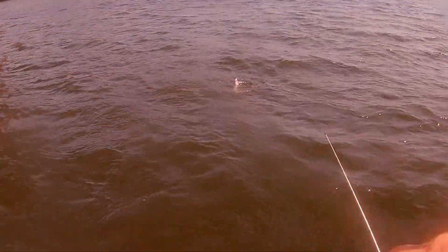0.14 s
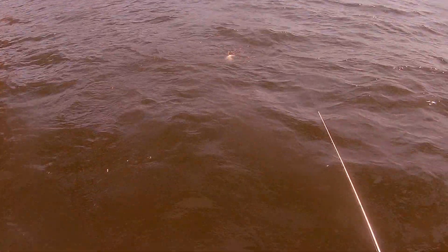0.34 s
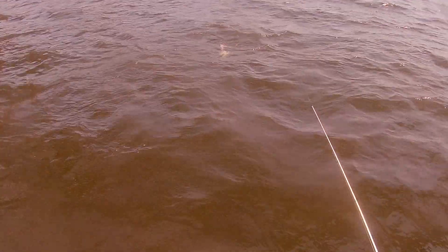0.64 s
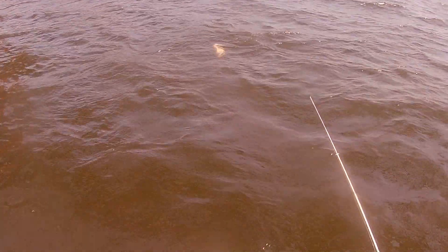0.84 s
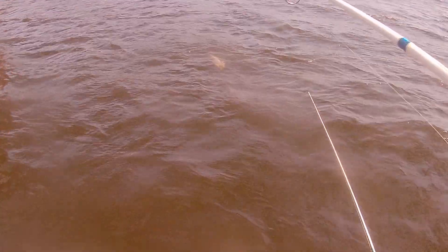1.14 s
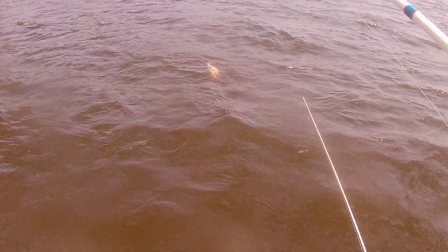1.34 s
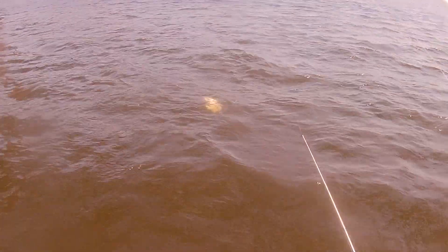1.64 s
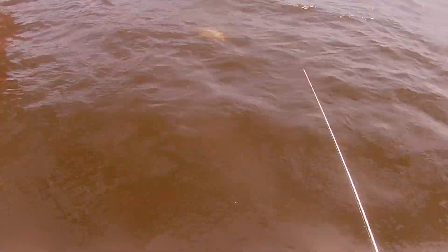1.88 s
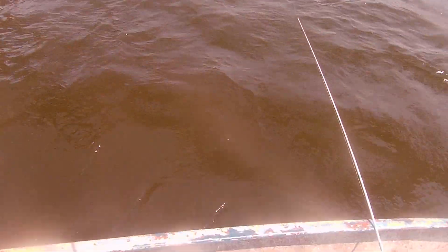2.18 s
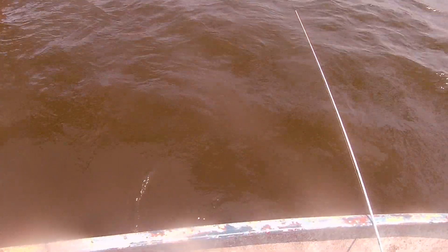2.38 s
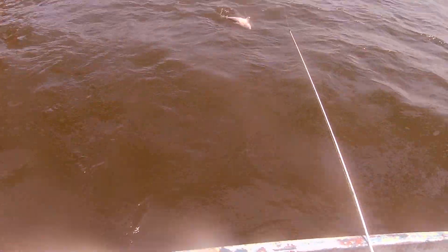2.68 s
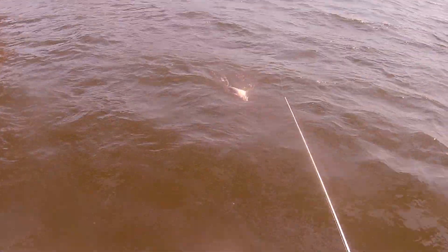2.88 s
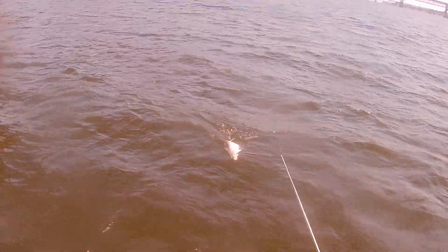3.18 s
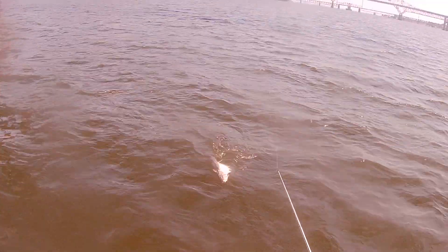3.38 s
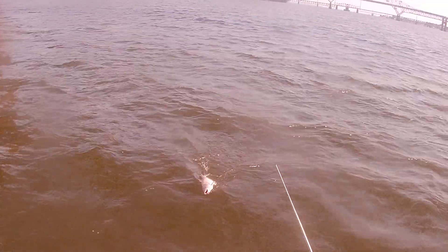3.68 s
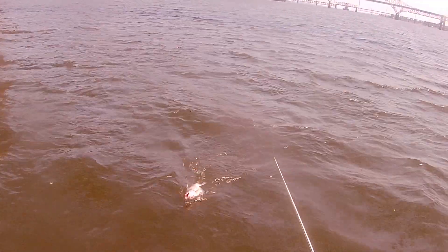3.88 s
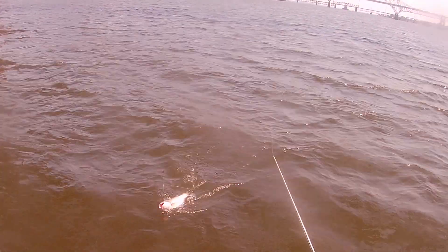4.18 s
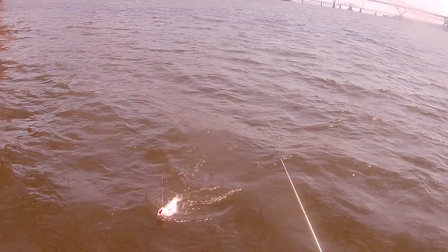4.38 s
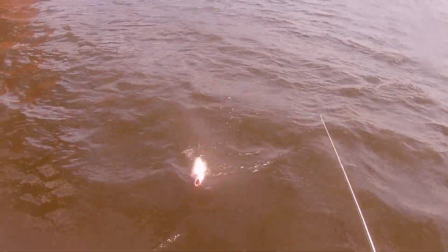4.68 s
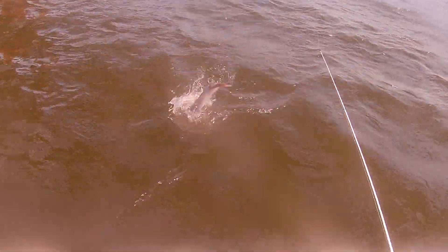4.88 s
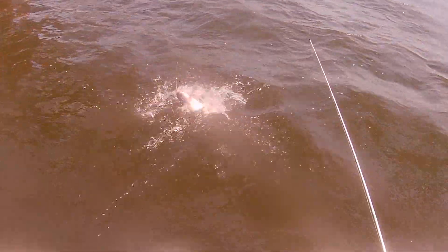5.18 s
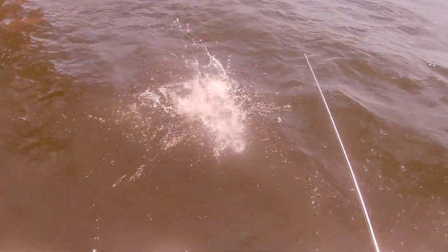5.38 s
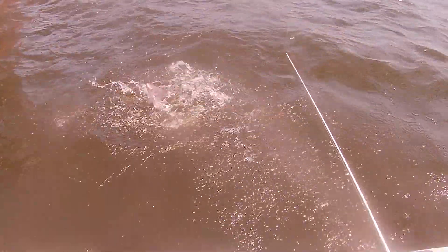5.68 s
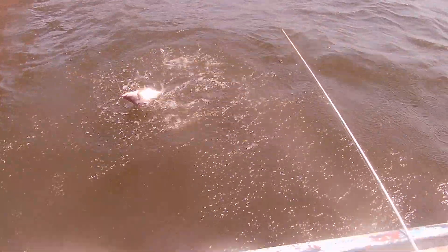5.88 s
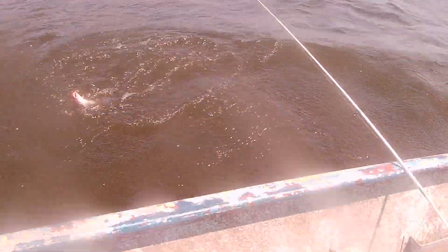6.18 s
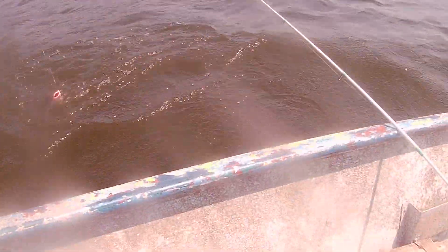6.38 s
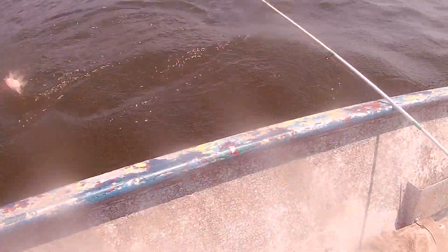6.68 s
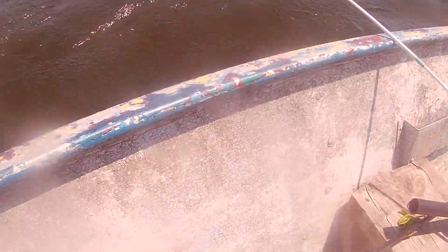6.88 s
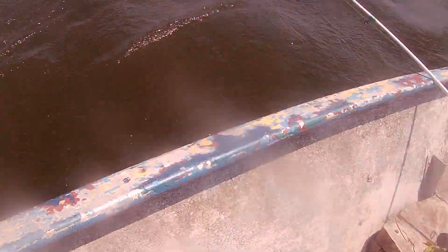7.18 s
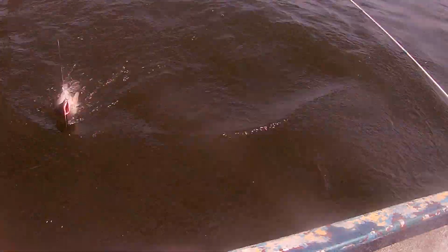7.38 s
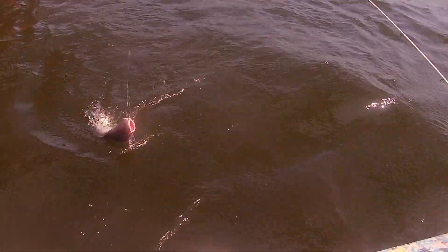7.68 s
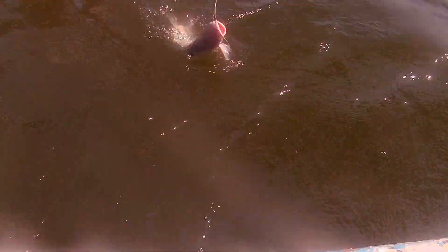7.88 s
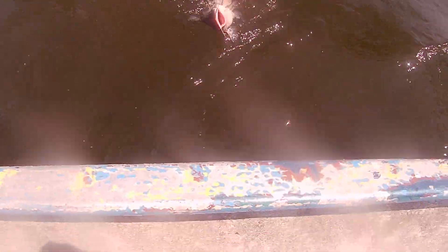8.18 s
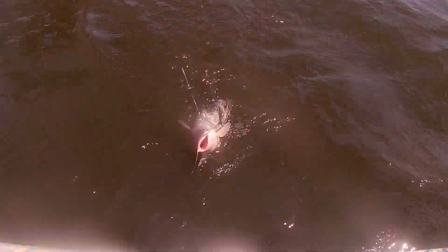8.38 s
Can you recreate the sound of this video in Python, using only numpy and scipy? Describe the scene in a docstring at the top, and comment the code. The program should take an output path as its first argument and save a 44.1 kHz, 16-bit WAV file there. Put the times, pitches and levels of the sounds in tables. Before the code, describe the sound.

Close, boxy bumps and scrapes on a camera housing drown out a hooked fish's dull splashing beside a boat, then hard clipped blows return.

```python
"""A sealed camera case worn on a strap is knocked, squeezed and rubbed, far louder than the water outside.
Blows ring the plastic and its mount, squeezes swing the air inside, and rubbing is dense noisy grains.
Faint behind the walls, a hooked fish splashes beside a boat on a wide river: slaps, bubbles and spray.
Tackle clicks, faint thin tones, lapping water, low rumble and microphone hiss lie around it.
The hardest blows overload the recorder, which clips them and cuts the extreme treble."""
import sys
import numpy as np
from scipy import signal
from scipy.fft import rfft, irfft, next_fast_len
from scipy.io import wavfile
from scipy.ndimage import uniform_filter1d

SR = 44100
rng = np.random.default_rng(int(sys.argv[2]) if len(sys.argv) > 2 else 0)


def dump(signal):
    """Clip the signal to [-1, 1] and save it as 16-bit WAV at the path in sys.argv[1]."""
    limited = np.clip(np.atleast_2d(signal).T, -1, 1)
    pcm = np.round(limited * 32767).astype(np.int16)
    wavfile.write(sys.argv[1], SR, pcm)


N = 376613  # length in samples

# Resonances of the plastic case when touched, before grip and blow alter them.
# Each row: frequency in Hz, width in Hz, relative level in dB.
CASE_MODES = [(265, 103, -1.5), (932, 204, -0.5), (1332, 197, 1.5), (1807, 355, -2.5), (2157, 113, -4.5),
              (2640, 120, -15.5), (3390, 110, -9.5), (3750, 190, -16.5), (4044, 324, -12), (5140, 230, -19),
              (6150, 72, -16.5), (7250, 100, -41.5), (8300, 270, -62), (9670, 260, -32)]
# Modes of the mount under the case, ringing freely.
# Each row: frequency in Hz, relative level in dB, time to fall 60 dB in seconds.
MOUNT_MODES = [(250, -8, 0.09), (1550, -6, 0.022), (915, -1.5, 0.07), (500, 1.5, 0.04), (635, 0, 0.155),
               (649, -11, 0.42)]
# Blows on the case, and a thump that may come from the hull.
# Each row: start in seconds, peak of the case sound in dB, brightness in dB per octave,
# gain of the two lowest case resonances in dB, gain of the main resonance in dB, contact in ms,
# rattle in dB against the blow, ring of the mount in dB, gain of its high mode in dB,
# gain of its low mode in dB, factor on the mount's ring time.
KNOCKS = [(1.408, -7, -1.5, 9, 7, 0.18, -32, -18, -18, -4, 0.63),
          (1.522, -13, 4.5, 4.5, -2, 0.25, -9.5, -32, 10, 6, 0.52),
          (1.568, -27, -10, 8, 0, 0.42, -14, -27, -20, 2, 0.67),
          (1.672, -5, -10, 7, 6, 0.1, -23, -21, 4.5, -2.5, 0.78),
          (1.752, -44, -5, 9, 0, 0.18, -17, -39, -12, -5, 1.1),
          (1.791, -31, 13, 7, -8, 0.19, -10, -28, -7, 4, 0.75),
          (1.942, -20, -1, 0, 1, 0.042, -15, -50, -6, 4, 0.98),
          (2.038, -26.5, -2, -7, -6, 0.33, -25, -47, 2, -2, 0.83),
          (2.054, -30, -6, -2, 0, 0.35, -18, -54, 3, 0, .9),
          (2.168, -50, -8, 0, 0, 0.77, -20, -39, -20, -12, 1.2),
          (2.216, -42, -12, 12, -4, .9, -14, -60, -10, 5, .6),
          (2.326, -30.5, -10, 0, -5, 0.47, -11, -33, -13, -4, 0.7),
          (2.39, -55, -8, -1, 0, 0.54, -20, -49, -20, -18, .9),
          (2.66, -62, -8, 0, 0, 0.54, -20, -56, -20, -15, 0.99),
          (2.7, -48, -10, 10, -4, 0.73, -10, -49, -5, 8, .7),
          (2.994, -47, -8, 14, 0, 0.73, -13, -45, -7, 11, 0.79),
          (3.098, -23, -13, 4, -3, 0.62, -16.5, -37, -7, 11.5, 0.3),
          (3.246, -17.5, -2.5, -7.5, -6, 0.31, -20, -38, -7, -11, 0.54),
          (3.26, -29, 5.5, 5, 10, 0.024, -28, -53, -7, 4, .9),
          (3.295, -56, -8, 8, 0, 0.65, -15, -50, -20, -15, 1.2),
          (3.361, -15, 2, -8, -5.5, 0.31, -25, -27, -0.5, -2, 0.88),
          (3.417, -21.5, 2, -5, -7, 0.45, -24, -26.5, 7.5, 3, 1.01),
          (3.552, -31, -14, 8, 0, 0.71, -13, -43, 4, 4, 1.2),
          (3.604, -16.5, 5, -8, -3, 0.22, -30, -41.5, 10, 0, 1.3),
          (3.62, -30, -23, -8, -4, 0.13, -19, -39.5, 6, 7, 1.1),
          (4.116, -26.5, -9, 9.5, 1, 0.26, -21, -42, -7, 9, 0.77),
          (4.278, -26, -8, 18, -2, .6, -14, -54.5, -9, -2, .9),
          (4.341, -30, -3.5, 6, -9, 0.25, -13.5, -51, 17.5, -5, 3.3),
          (4.407, -40, 0, 11, -2, 0.17, -14, -33.5, -21, -14, 0.85),
          (4.416, -44, 0, 6, -3, 0.18, -14, -27.5, -23, -18, 0.34),
          (4.43, -44, -3, 8, 0, .22, -14, -53.5, 24, -3, 1.5),
          (4.683, -64, -8, 0, 0, 0.38, -20, -52, -20, -17, .8),
          (4.745, -37, -3, 1, -3, 0.48, -9, -60, 1, 0, .4),
          (4.837, -37, -1, 1, -4, 0.66, -7, -62, 0, 4, .5),
          (6.05, -52, -8, 3, 0, 0.46, -14, -47.5, -13, -10, 0.72),
          (6.2, -50, -6, -0.5, -2.5, .4, -6, -66, -7, 2, .7),
          (6.803, -42, -10, 18, 0, 0.64, -10, -55, 0, 0, .8),
          (6.824, -47, -5, 18, 0, 0.62, -6, -62, 0, 0, .8),
          (7.592, -3.5, -23, 5.5, 4.5, 0.45, -22, -35, 13, -3, 1.8),
          (7.678, 2.5, -4, 4, -0.5, 0.16, -17, -15.5, 5, 3, 0.84),
          (7.745, -28, -9, 10, -2, 0.73, -26, -29, -2, 10, 0.62),
          (7.8954, 14, -12, -14, 0, .25, -30, -23, -9, 4, .5),
          (7.98, -22, -3, 1, 2, 0.43, -11, -32, -14, 6, 1), (8.15, -30, -15, 10, 0, 1, 0, -48, 3, 0, 0.75),
          (8.25, -33, -11, 16, -4, 0.87, -10, -43, -2, 15, 0.43),
          (8.295, -8.5, -1, 12, 5.5, 0.19, -21.5, -20, -13, 7.5, 0.85),
          (8.44, -28, -10.5, 17, -6, 0.3, -10, -50.5, 22, 0, 0.57)]
# The case is squeezed and the air inside swings.
# Each row: time of the dip in seconds, depth in dB, swing in Hz at the dip,
# share left half a cycle before (0-1), share left half a cycle after (0-1).
SQUEEZES = [(1.4094, -8, 418, 0.57, 0.15), (1.418, -0.5, 80, 0.4, 0.14), (1.528, -6.5, 87, 0, 0.86),
            (1.573, -22, 87, 0.9, 0.3), (1.68, -9.5, 108, 0, 0.2), (1.766, -9.5, 46.3, 0.76, 0.75),
            (1.797, -4, 66, 0, 0.6), (1.82, -16, 59, 0.8, 0.96), (1.963, -20.5, 48.6, 0, 0.95),
            (2.055, -15, 145, 0.02, 0.78), (2.196, -21.5, 39.4, 0.8, 0.88), (2.254, -29, 40, 1, 0.6),
            (2.328, -3, 116, 0, 0.02), (2.583, -31, 59, 0.8, 0.99), (2.62, -32, 48, 0, 0.3),
            (2.902, -30, 61, 0, 0.99), (2.995, -23.5, 123, 0.04, 0.93), (3.076, -23.5, 92.5, 0.2, 0.64),
            (3.248, -13.5, 228, 0, 0.94), (3.362, -11.5, 413, 0.02, 0.04), (3.419, -15, 408, 0, 0),
            (3.605, -19, 340, 0, 0.2), (3.62, -23.5, 157, 0, 0.5), (4.125, -25.5, 111, 0.1, 0.85),
            (6.663, -38, 117, 0.9, 0.1), (6.83, -34.5, 22, 0.7, 0.5), (7.603, 3.5, 78.5, 0.76, 0.27),
            (7.613, -9, 105, 0, 0), (7.65, -4, 59, 0.4, 0.1), (7.668, -2, 66.6, 0.35, 0.3),
            (7.7, -2.5, 68, 0, 0.87), (7.791, -11.5, 93, 0.1, 0.44), (7.809, -19, 70, 0.4, 1),
            (7.977, -12.5, 113, 0, 0.73), (8.153, -18, 121, 0, 0.63), (8.272, -31, 170, 0.56, .6),
            (8.335, -23, 150, 0.2, 0.2), (8.459, -16, 46.2, 1, 0.85)]
# Single scrapes of the case.
# Each row: start in seconds, end in seconds, rise in ms, force in dB, change in dB by the end,
# brightness in dB per octave, treble gain in dB, shake of the mount in dB against the force.
SCRAPES = [(1.381, 1.411, 9.4, -46, 5, -4, 0, -22), (1.408, 1.502, 1.5, -32, -4.5, -0.5, 1.5, -28),
           (1.554, 1.578, 10.7, -29, 0.5, -6, 0, -30), (1.581, 1.625, 4.2, -34, -1.5, -4, -3, -31),
           (1.626, 1.658, 5.3, -39.5, -1, -10, 0, -25), (1.654, 1.695, 8.1, -36.5, 7, -2.5, 0, -21),
           (1.672, 1.709, 4.3, -25.5, -2.5, -7, 9, -24), (1.745, 1.795, 4, -30, -7.5, 0, -2, -27),
           (1.79, 1.848, 2.4, -32.5, -3, -2.5, 5, 0), (2.001, 2.017, 4, -39.5, -5, -9, -3, -15),
           (2.053, 2.192, 61, -30.5, -7, -4.5, -2, -14), (2.329, 2.382, 1.8, -36.5, -29, -8, 0, -9),
           (2.912, 2.96, 6.3, -44, -10, -5, -2, -15), (3.041, 3.082, 6.3, -47.5, -6, -9, 0, -22),
           (3.558, 3.588, 6, -45, -9, -4, 0, 4), (3.806, 3.897, 13, -54, 4, -2.5, 0, 2.5),
           (3.946, 4.056, 28, -45.5, -1, -3.5, -2, -5), (4.205, 4.326, 52, -42.5, -2.5, -2.5, 10, -5.5),
           (4.332, 4.357, 5.7, -45, -8, -2, 0, 6), (4.382, 4.435, 3.8, -48.5, 8, -3, -3, -1),
           (6.022, 6.083, 8, -62, -10, -5, 0, 10), (6.163, 6.28, 12, -55.5, -1, -7, 5, -5),
           (6.775, 6.886, 27, -47, -5.5, -7.5, 0, -8), (7.59, 7.621, 1.1, -39, -8, 5.5, 5, -7),
           (7.607, 7.642, 4, -29.5, 4, -2.5, 11.5, 5.5), (7.646, 7.677, 6, -44, -4, 5, 1, -20),
           (7.689, 7.717, 3.6, -30, 6, -3, -4, -25), (7.89, 7.939, 6.3, -34.5, -15.5, 4, 1, -24),
           (8.263, 8.309, 23, -51, 15, -0.5, -2, -22), (8.305, 8.343, 1.4, -37, -14, -3.5, 1, -27),
           (8.434, 8.467, 5, -47, -1, -6.5, 3, -21)]
# The strap creeps over the case: one list of points for each stroke.
# Each row: time in seconds, force in dB, brightness in dB per octave.
CREEP = [
    [(1.41, -29.5, -3.5), (1.55, -43, -2), (1.65, -47, -4.5), (1.848, -42.5, -3.5), (1.996, -51.5, -2.5),
     (2.126, -49, -6.5), (2.2, -61, -9), (2.4, -86, -5)],
    [(2.62, -65, -4), (2.99, -51.5, -7), (3.4, -58.5, -2), (4.27, -52, -7.5), (4.62, -68, -8.5)],
    [(7.6, -40, -13.5), (7.644, -34.5, -6), (7.764, -42.5, -2.5), (7.802, -46, -11), (8.278, -65.5, -11.5),
     (8.394, -51, -8.5), (8.54, -63, -2)],
]
# Resonances of the walls and seal for sound arriving through the air.
# Each row: frequency in Hz, width in Hz, relative level in dB.
WALL_MODES = [(262, 150, -16.5), (1020, 470, -17), (1364, 168, 7.5), (1885, 216, 2), (2042, 245, -3.5),
              (3527, 103, -5), (3673, 98, -5.5), (4190, 130, -15.5), (4100, 92, -17.5), (5270, 230, -23),
              (5970, 140, -28.5), (6450, 170, -26.5), (6900, 160, -34), (9450, 490, -46.5)]
# Tail slaps and large drops.
# Each row: start in seconds, peak in dB, brightness in dB per octave, decay constant in ms.
SLAPS = [(0.515, -47.5, 9, 10), (0.774, -48, 0, 34), (0.89, -54, 0, 8), (1.095, -42.5, -4, 3.6),
         (1.127, -57, 13, 9.3), (4.741, -41, -0.5, 12), (4.75, -43, -6, 3.4), (4.778, -45, -1, 4),
         (4.837, -39.5, -7, 3.3), (4.881, -53, -9, 6), (4.897, -50, 1, 6), (4.936, -36.5, 12.5, 8.9),
         (4.983, -39, -3, 7.6), (5.033, -37, -6, 12), (5.047, -40.5, -1, 20), (5.072, -36.5, 7, 8.8),
         (5.105, -40, -5, 11), (5.223, -43, 11, 1.6), (5.239, -36.5, -10, 3.1), (5.249, -36.5, 3.5, 3.3),
         (5.318, -41.5, 9, 11), (5.341, -41.5, 9, 18), (5.421, -34, -4, 10), (5.501, -44, -2, 15),
         (5.584, -33, 8.5, 3.7), (5.629, -59, 2, 5), (5.656, -46, 5, 6.7), (5.706, -41, -0.5, 4.1),
         (5.748, -43.5, -4, 9.4), (5.787, -40, -17, 3.9), (5.916, -47, -6, 3.3), (6.113, -44, -9, 8.2)]
# The fish churns the surface in gushes.
# Each row: time of the peak in seconds, gain in dB before the walls, 60 dB fall in seconds.
GUSHES = [(4.745, -72, .8), (4.838, -53, 0.18), (4.91, -51, 2.9), (5.036, -48, 0.44), (5.24, -57, 0.49),
          (5.356, -49.5, 3), (5.588, -65, 0.12), (5.682, -59, 1.5), (5.92, -71, 0.042)]
# The fish is dragged along the surface: one list of points for each drag.
# Each row: time in seconds, level in dB before the walls.
WAKE = [
    [(2.72, -84), (2.82, -64.5), (3.08, -64), (3.3, -97)],
    [(7.7, -42), (7.75, -46), (7.83, -48.5), (7.88, -55), (7.96, -54.5), (8.12, -63.5), (8.25, -65.5),
     (8.36, -62), (8.42, -51)],
]
# Tackle clicks somewhere in the boat.
# Each row: start in seconds, peak in dB, brightness in dB per octave, decay constant in ms, top in Hz.
CLICKS = [(1.282, -32.5, 2, 6.9, 7040), (1.305, -43.5, 21, 3.8, 6900), (1.34, -41, 4.5, 13, 7000),
          (6.704, -17, 10, 8.4, 4400), (6.725, -34.5, -5, 22, 4400), (6.925, -47.5, 4, 30, 4500),
          (7.355, -38, 7, 8.2, 5000)]
# Faint thin tones, falling ones near 1.4 kHz and brief high ones, before their wavering.
# Each row: start in seconds, length in seconds, start pitch in Hz, end pitch in Hz, level in dB.
THIN_TONES = [(0.449, 0.084, 1473, 1400, -59), (0.468, .04, 7350, 7350, -68), (.54, .03, 7350, 7350, -66),
              (0.602, 0.1, 1405, 1290, -51), (0.943, .03, 7350, 7350, -61.5), (1.01, .04, 7350, 7350, -67),
              (1.066, 0.11, 7440, 7250, -62.5), (1.164, 0.064, 7350, 7350, -63)]
# The wearer shifts and the case rumbles on.
# Each row: time of the peak in seconds, gain in dB, 60 dB fall in seconds.
HEAVES = [(1.45, -30, 0.63), (1.54, -22.5, 1), (1.82, -36.5, 10), (2.0, -29, 0.58), (2.25, -54, 1),
          (2.58, -61, 1.1), (2.8, -32.5, 0.64), (2.9, -38, 9.4), (7.72, -16.5, 0.61), (7.82, -29.5, 3.8),
          (7.99, -27.5, 0.93), (8.44, -39, 0.2)]
# Low rumble of wind and hull. Each row: time in seconds, level in dB.
RUMBLE = [(0.0, -48), (2.5, -48), (3.5, -78), (4.5, -49), (4.7, -43), (5.3, -44), (6.5, -49), (6.9, -46),
          (8.54, -47)]
# Spectrum of the rumble. Each row: frequency in Hz, relative density in dB per Hz.
RUMBLE_COLOUR = [(12, -46), (20, 8.5), (48, -6.5), (92, -3.5), (141, -15), (245, -11.5), (295, -22),
                 (386, -23.5), (600, -26.5), (780, -35.5), (1320, -120)]
# Spectrum of the microphone hiss. Each row: frequency in Hz, relative density in dB per Hz.
HISS_COLOUR = [(200, 11.5), (2000, 1.5), (8000, -10), (15000, -14.5)]

BLOW_DAMPING = 1.03  # whatever strikes the case widens its resonances by this factor
TOP_CYCLES = 1.33  # a blow holds little treble above this many cycles per contact
RATTLE_MS = 3.4  # decay constant
GRIP_SHIFT, GRIP_DB = 0.015, 1.5  # each touch moves the resonances by about this share and level
TREBLE_HZ = 4800  # where the thin treble resonances of the case begin
PATCHY_DB = 2  # rubbing swells and fades in patches of pitch and time
CREEP_MOUNT_DB, CREEP_DRAG_DB, CREEP_RISE_MS = -9.5, -1.5, 2
SCRAPE_DRAG_DB, DRAG_PER_BRIGHTNESS = 4.5, 2.37  # brighter rubbing drags the air harder
LIFT_MS, LIFT_PER_RISE = 10, 0.84  # a scrape that starts softly also ends softly
SLAP_TOP_HZ, TOP_DOUBLES_DB = 5070, 13.5  # the top doubles for this much more brightness (dB per octave)
DULL_BODY = 1  # dB of low body gained per dB per octave of lost brightness
GUSH_RISE_DB_PER_S, GUSH_SPRAY, WAKE_SPRAY = 307, 0.73, 0.23  # weights of fine spray 0-1
WAKE_SLOPE_DB = -2  # the dragged fish sounds duller than the gushes (dB per octave)
HEAVE_RISE_DB_PER_S, HEAVE_TOP_HZ = 349, 320  # the case rumbles darker than the wind
RIVER_DB, RIVER_SWELL_DB = -64.5, 3  # lapping water: level and spread of its wavering
HISS_DB = -60
EDGE_HZ = 15850  # upper band limit of the recorder
STFT = dict(fs=SR, nperseg=512, noverlap=384)


def knocks():
    """A sharp blow and a short rattle ring the case; the blow also rings the mount."""
    out, t = np.zeros(N), np.arange(8000) / SR
    noise = rng.standard_normal((len(KNOCKS), len(t)))
    for row, rattle in zip(KNOCKS, noise):
        s, peak_db, slope_db, body_db, main_db, contact_ms, rattle_db, *mount = row
        mount_db, high_db, low_db, ring_factor = mount
        contact_ms = max(contact_ms, .02)
        u = t / (contact_ms / 4000)
        contact = u * np.exp(-u)
        contact /= np.sum(contact)  # a long contact takes the treble away
        blow = amp(rattle_db) * rattle * np.exp(-t / (RATTLE_MS / 1000))
        blow -= t == 0  # the blow itself starts with a negative swing
        blow = signal.oaconvolve(blow, contact[:256])[:len(t)]
        top_hz = np.clip(TOP_CYCLES * 1000 / contact_ms, 500, SR / 3)
        blow = signal.lfilter(*signal.butter(3, top_hz, fs=SR), blow)
        modes = gripped(rattle[-len(CASE_MODES):], main_db, damping=BLOW_DAMPING)
        case = through(modes, blow, slope_db, body_db)
        mount_ring = through_mount(contact, high_db, low_db, max(ring_factor, .1))
        add(out, s, amp(peak_db) * case / abs(case).max() - amp(mount_db) * mount_ring)
    return out


def squeezes():
    """Air pressure swings, dips as the case is squeezed, and rebounds ever more slowly."""
    out = np.zeros(N)
    for s, db, hz, before, after in SQUEEZES:
        u = np.arange(-3 * SR // (4 * hz), 3 * SR // hz) / SR * hz  # cycles from the dip
        share = np.clip(np.where(u < 0, before, after), .01, .99)
        left = share ** np.where(u < 0, (2 * u) ** 2, (2 * u.clip(0)) ** 2.3)
        swing = u / (1 + 0.44 * u.clip(0))  # the rebound slows down
        add(out, s + u[0] / hz, -amp(db) * left * np.cos(2 * np.pi * swing))
    return out


def rubbing():
    """Dense stick-slip grains shake the case and the mount and drag the air inside."""
    out = np.zeros(N)
    grains = rng.standard_normal(N) * amp(2.6 * rng.exponential(1, N))
    grains = patchy(evened(grains * lumps(250, 1.8) * lumps(40, 1)), PATCHY_DB)
    air_band = signal.butter(2, [100, 550], "band", fs=SR)
    drag = evened(signal.lfilter(*air_band, rng.standard_normal(N)))
    ring_size = np.linalg.norm(through_mount(signal.unit_impulse(8000)))  # steady shaking builds the ring up
    strokes = [([(s0, db, slope), (s1, db + change, slope)], rise, treble, mount, SCRAPE_DRAG_DB)
               for s0, s1, rise, db, change, slope, treble, mount in SCRAPES]
    strokes += [(rows, CREEP_RISE_MS, 0, CREEP_MOUNT_DB, CREEP_DRAG_DB) for rows in CREEP]
    grips = rng.standard_normal((len(strokes), len(CASE_MODES)))
    for (rows, rise_ms, treble_db, mount_db, drag_db), grip in zip(strokes, grips):
        start, end = rows[0][0], rows[-1][0]
        at = np.arange(round(start * SR), min(round(end * SR) + 6000, N))  # room for the ringing
        db, slope_db = curve(rows, at / SR)
        rise = (at / SR - start) / (max(rise_ms, .5) / 1000)
        lift = (end - at / SR) / ((LIFT_MS + LIFT_PER_RISE * rise_ms) / 1000)
        force = amp(db) * np.clip(np.minimum(rise, lift), 0, 1)
        shake = np.roll(grains, at[0])[at]
        out[at] += through(gripped(grip, treble_db=treble_db), tilted(shake, slope_db) * force)
        out[at] += amp(drag_db + DRAG_PER_BRIGHTNESS * slope_db) * drag[at] * force
        out[at] += through_mount(amp(mount_db) * force * shake) / ring_size
    return out


def slaps():
    """Tail slaps and large drops: bursts of noise whose treble limit rises with brightness."""
    rows = []
    for row in SLAPS:
        top_hz = SLAP_TOP_HZ * 2 ** (row[2] / TOP_DOUBLES_DB)
        rows.append((*row, min(top_hz, SR / 3)))
    return bursts(rows)


def churning():
    """The fish stirs up bubbles and fine spray, in quick gushes or dragged along the surface."""
    t = np.arange(N) / SR
    large = bubbles(2500, 706, 2425, 3.8, 3.0)
    fine = bubbles(7000, 1990, 6750, 8.8, 4.1)
    churn = (1 - GUSH_SPRAY) * large + GUSH_SPRAY * fine
    churn *= swells(GUSHES, GUSH_RISE_DB_PER_S)
    wake = evened(tilted((1 - WAKE_SPRAY) * large + WAKE_SPRAY * fine, WAKE_SLOPE_DB))
    for rows in WAKE:
        # fades in over the first stretch and out over the last
        on = np.interp(t, [rows[0][0], rows[1][0], rows[-2][0], rows[-1][0]], [0, 1, 1, 0])
        churn += wake * amp(curve(rows, t)[0]) * on
    return through(WALL_MODES, churn * lumps(60, 2.5))


def clicks():
    """Tackle clicks in the boat: short noise bursts heard through the walls."""
    return bursts(CLICKS)


def thin_tones():
    """Thin sine tones, some gliding, unsteady in pitch and level."""
    out, waver = np.zeros(N), lumps(150, 0.4)
    for s, length, start_hz, end_hz, db in THIN_TONES:
        hz = np.linspace(start_hz, end_hz, round(length * SR))
        hz += 1000 * (waver[round(s * SR):][:len(hz)] - 1)
        add(out, s, amp(db) * np.hanning(len(hz)) * np.sin(2 * np.pi * np.cumsum(hz) / SR))
    return out * lumps(89.5, 3.9)


def river():
    """Water laps outside the walls: dull noise and many bubbles that slowly waver in level."""
    wash = tilted(rng.standard_normal(N), -5.5) + amp(-9.0) * bubbles(1300, 668, 6830, 5.6, 3.2)
    return amp(RIVER_DB) * evened(through(WALL_MODES, wash)) * lumps(2.5, RIVER_SWELL_DB)


def rumble():
    """Low noise of wind and hull, with a darker noise surging as the wearer shifts."""
    wind = amp(curve(RUMBLE, np.arange(N) / SR)[0]) * coloured(RUMBLE_COLOUR)
    heave = signal.lfilter(*signal.butter(1, HEAVE_TOP_HZ, fs=SR), coloured(RUMBLE_COLOUR))
    return wind + swells(HEAVES, HEAVE_RISE_DB_PER_S) * heave


def hiss():
    """Steady microphone noise, falling towards the treble."""
    return amp(HISS_DB) * coloured(HISS_COLOUR)


def gripped(chance, main_db=0, treble_db=0, damping=1):
    """The case resonances, each moved a little in pitch and level by the present grip."""
    modes = []
    for k, ((hz, width, db), shift, change) in enumerate(zip(CASE_MODES, chance, chance[::-1])):
        level_db = db + GRIP_DB * change + main_db * (k == 2) + treble_db * (hz > TREBLE_HZ)
        modes.append((hz * (1 + GRIP_SHIFT * shift), width * damping, level_db))
    return modes


def through(modes, x, slope_db=0, body_db=0):
    """Brief ringing at each resonance; like signs leave dark gaps between the upper ones."""
    t, ring = np.arange(2048) / SR, 0
    for k, (hz, width, db) in enumerate(modes):
        # bright sources favour the upper resonances; body lifts the lowest two
        db += slope_db * np.log2(hz / modes[2][0]) if k > 1 else body_db
        sign = (-1) ** min(k, 4)
        ring += sign * amp(db) * width * np.exp(-np.pi * width * t) * np.sin(2 * np.pi * hz * t)
    return signal.oaconvolve(x, ring / np.linalg.norm(ring))[:len(x)]


def through_mount(x, high_db=0, low_db=0, ring_factor=1):
    """Mount ringing with two weighted modes; a factor below 1 shortens it, above 1 lengthens it."""
    t, ring = np.arange(8000) / SR, 0
    for k, (hz, db, t60) in enumerate(MOUNT_MODES):
        level_db = db + high_db * (k == 2) + low_db * (k == 3)
        ring += amp(level_db - 60 * t / (t60 * ring_factor)) * np.sin(2 * np.pi * hz * t)
    return signal.oaconvolve(x, ring)[:len(x)]


def bursts(rows):
    """Short dying bursts of noise that arrive through the air and the walls."""
    out, t = np.zeros(N), np.arange(4096) / SR
    noises = rng.standard_normal((len(rows), len(t)))
    for (s, peak_db, slope_db, ms, top_hz), noise in zip(rows, noises):
        noise = signal.lfilter(*signal.butter(5, top_hz, fs=SR), noise)
        envelope = (1 - np.exp(-t / 0.00027)) * np.exp(-t / (ms / 1000))
        burst = through(WALL_MODES, noise * envelope, slope_db, -DULL_BODY * min(slope_db, 0))
        add(out, s, amp(peak_db) * burst / abs(burst).max())
    return out


def bubbles(per_s, low_hz, high_hz, cycles, spread_db, count=24):
    """Short rising tones at random moments; a few are large."""
    size = amp(spread_db * np.minimum(rng.exponential(1, N), 5)) * (rng.random(N) < per_s / SR)
    kind, out = rng.integers(0, count, N), np.zeros(N)
    for k, hz in enumerate(np.geomspace(low_hz, high_hz, count)):
        u = np.arange(1500) / SR * hz
        tone = (1 - np.exp(-3 * u)) * np.exp(-u / cycles) * np.sin(2 * np.pi * u * (1 + 0.015 * u))
        out += signal.oaconvolve(size * (kind == k), tone / np.linalg.norm(tone))[:N]
    return evened(out)


def coloured(points):
    """Steady noise with a given spectrum, at unit level."""
    hz, db = np.transpose(points)
    size = next_fast_len(N)
    f = np.fft.rfftfreq(size, 1 / SR)
    z = rfft(rng.standard_normal(N), size) * amp(np.interp(np.log(f + 1), np.log(hz), db))
    return evened(irfft(z, size)[:N])


def tilted(x, slope_db):
    """Tilts short-time spectra about the main case resonance by slope_db per octave."""
    hz, t, z = signal.stft(x, **STFT)
    slope_db = np.interp(t * SR, np.arange(len(x)), slope_db * np.ones(len(x)))
    octaves = np.log2(np.maximum(hz, 200) / CASE_MODES[2][0])
    z *= amp(octaves[:, None] * slope_db)
    return signal.istft(z, **STFT)[1][:len(x)]


def patchy(x, spread_db):
    """Random blots of gain over pitch and time."""
    z = signal.stft(x, **STFT)[2]
    blots = uniform_filter1d(rng.standard_normal(z.shape[::-1]), size=5, axis=0)  # over time
    blots = uniform_filter1d(blots, size=4, axis=1)  # over pitch
    return evened(signal.istft(z * amp(spread_db * evened(blots).T), **STFT)[1][:len(x)])


def lumps(per_s, spread_db):
    """A gain that wavers at random."""
    step = np.arange(0, N + SR, SR / per_s)
    return amp(spread_db * np.interp(np.arange(N), step, rng.standard_normal(len(step))))


def swells(rows, rise_db_per_s):
    """A gain that climbs to each peak and dies away after it; overlaps add as power."""
    t = np.arange(0, N + 64, 64) / SR
    power = 0
    for s, db, t60 in rows:
        power += amp(db - np.maximum(rise_db_per_s * (s - t), 60 * (t - s) / t60)) ** 2
    return np.interp(np.arange(N) / SR, t, np.sqrt(power))


def curve(rows, t):
    """Straight lines through the points of each column."""
    s, *columns = np.transpose(rows)
    return [np.interp(t, s, c) for c in columns]


def amp(db):
    """Decibels to amplitude."""
    return 10 ** (np.asarray(db) / 20)


def evened(x):
    """Scales to unit RMS level."""
    return x / np.sqrt(np.mean(x ** 2) + 1e-20)


def add(mix, s, sound):
    """Lays a sound into the mix at s seconds."""
    part = mix[round(s * SR):][:len(sound)]
    part += sound[:len(part)]


def scene():
    """All sources at one microphone inside the case."""
    handling = knocks() + squeezes() + rubbing()
    fish = slaps() + churning()
    return (handling + fish + clicks() + thin_tones() + river() + rumble() + hiss())[None]


def record(dry):
    """Hard overload at full scale, then the band limit."""
    clipped = np.clip(dry, -1, 1)
    band = signal.firwin(511, EDGE_HZ, window=("kaiser", 9), fs=SR)
    return signal.oaconvolve(clipped, band[None], "same")


dry = scene()
out = record(dry)
dump(out)
```